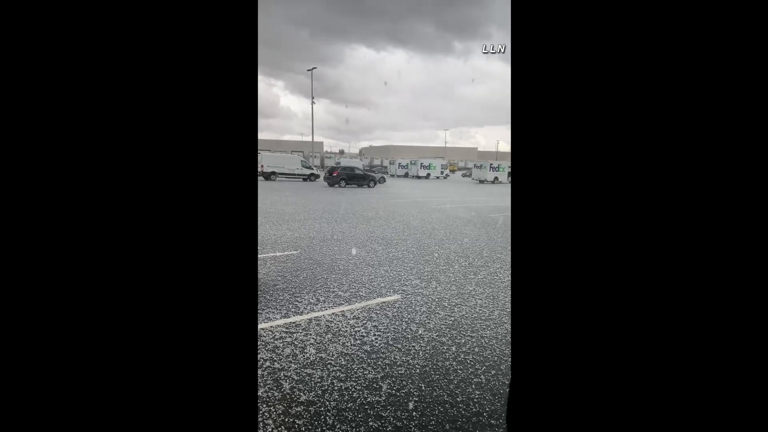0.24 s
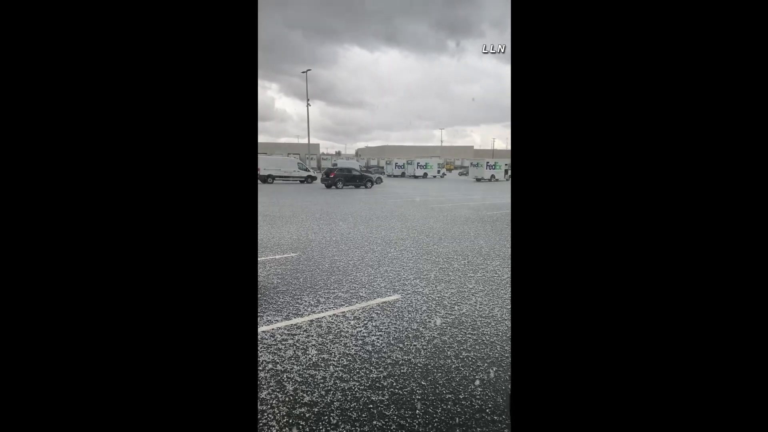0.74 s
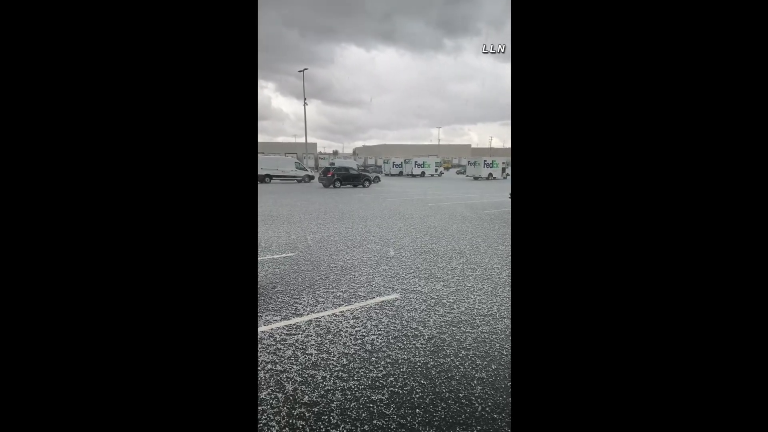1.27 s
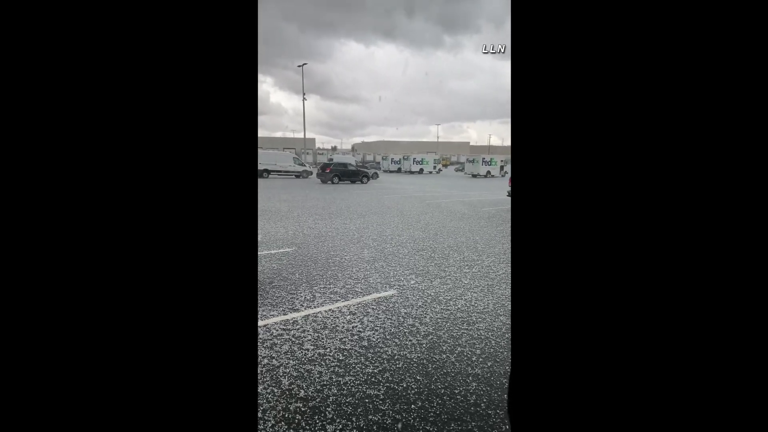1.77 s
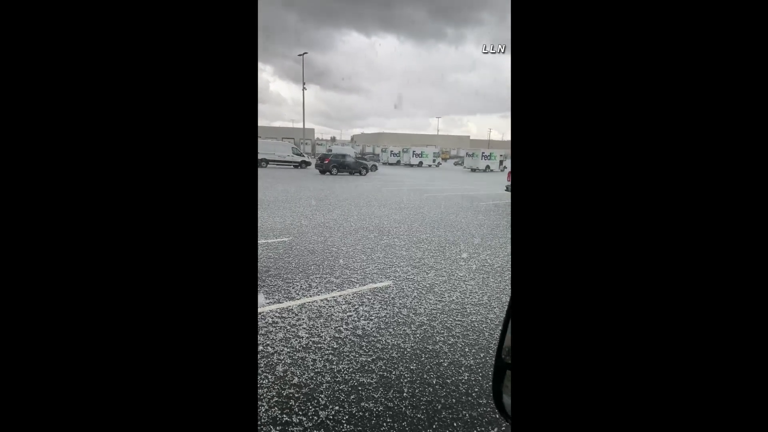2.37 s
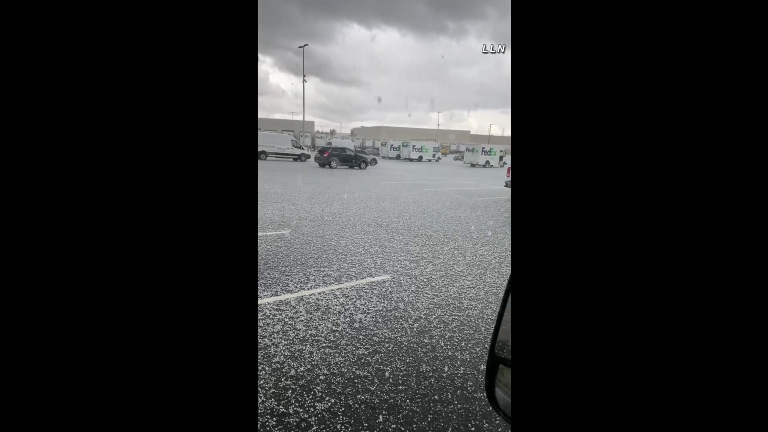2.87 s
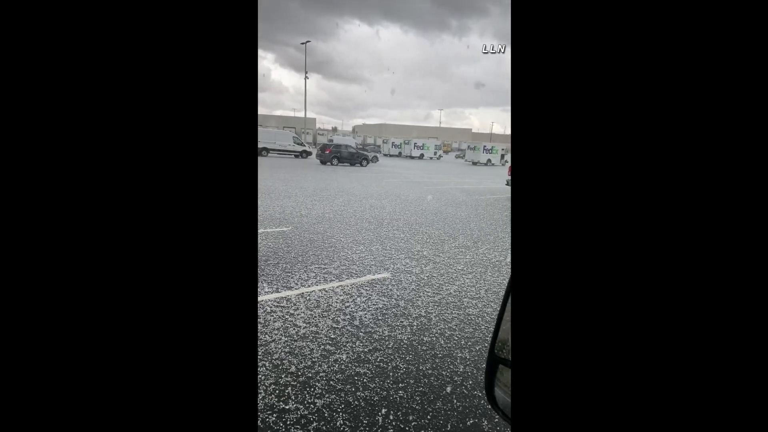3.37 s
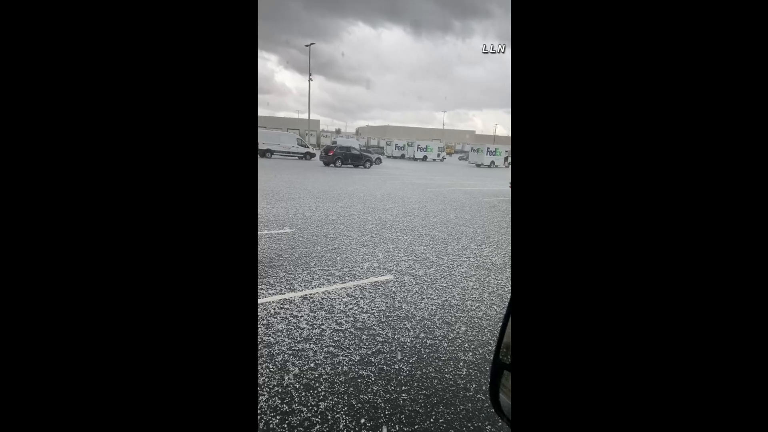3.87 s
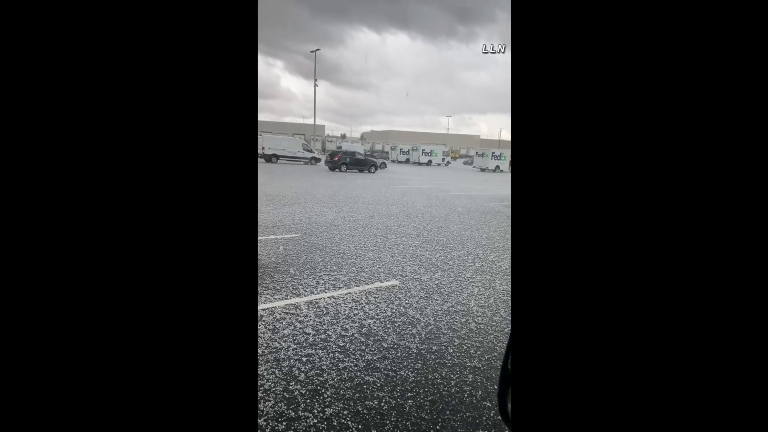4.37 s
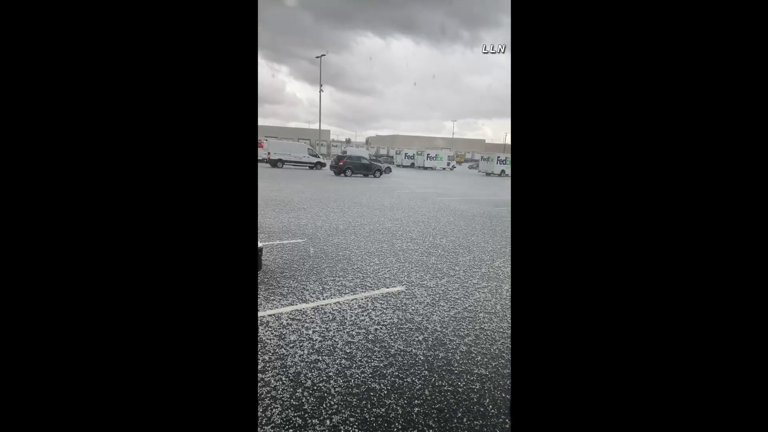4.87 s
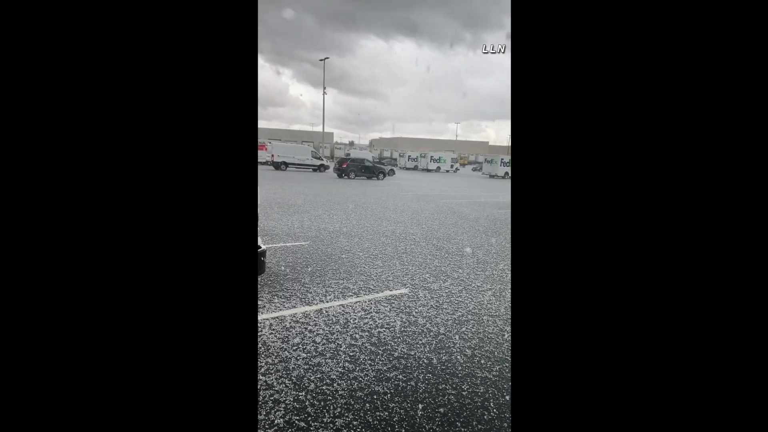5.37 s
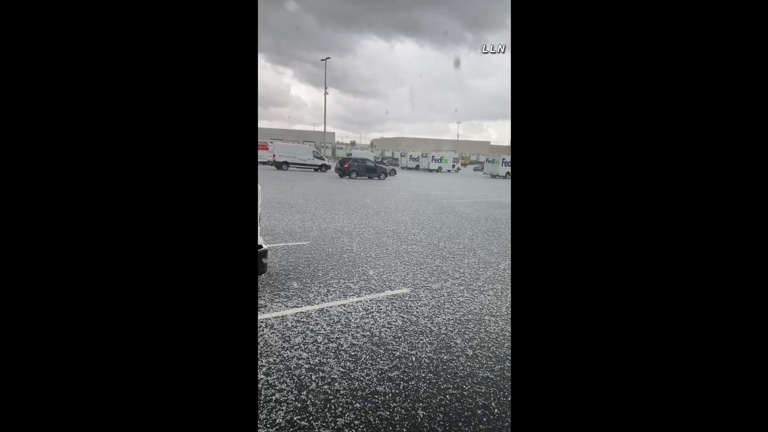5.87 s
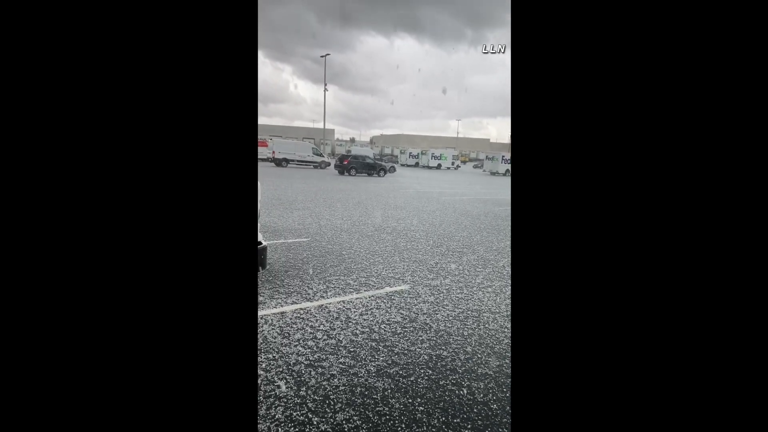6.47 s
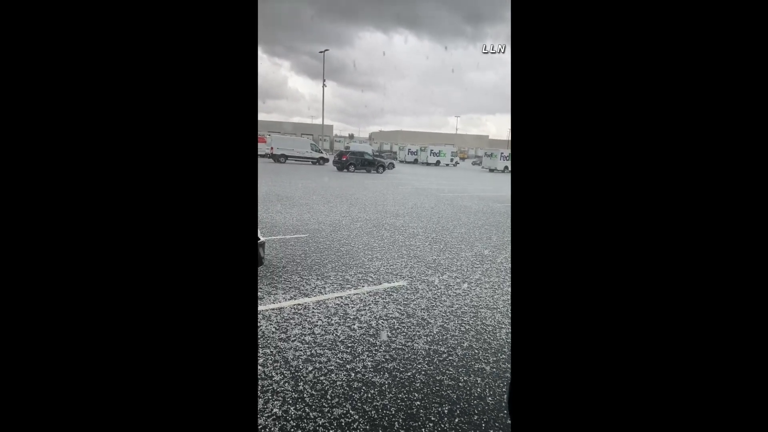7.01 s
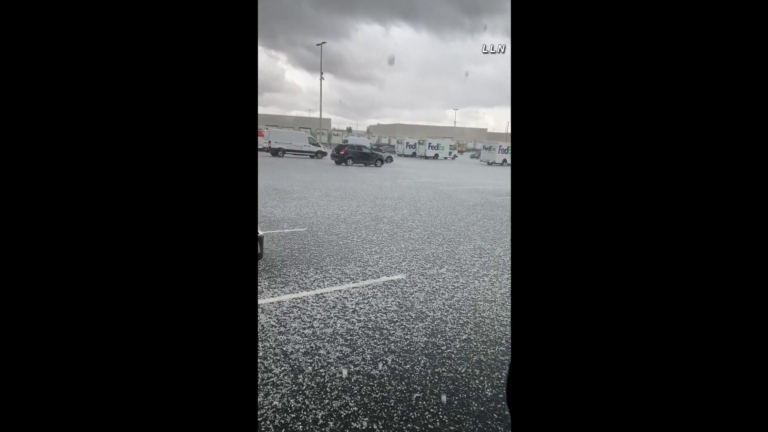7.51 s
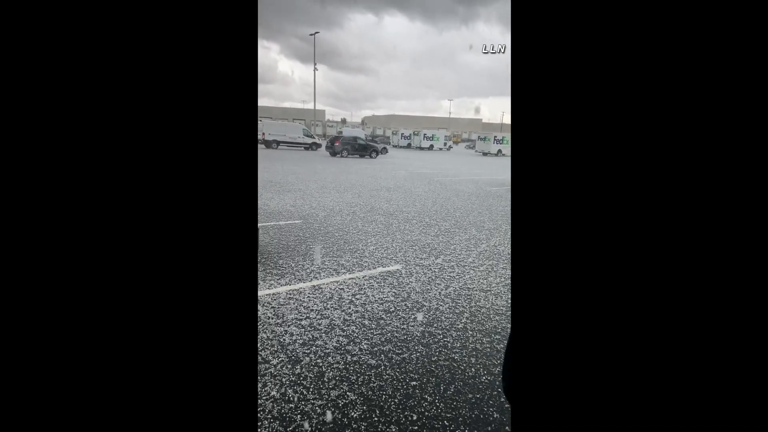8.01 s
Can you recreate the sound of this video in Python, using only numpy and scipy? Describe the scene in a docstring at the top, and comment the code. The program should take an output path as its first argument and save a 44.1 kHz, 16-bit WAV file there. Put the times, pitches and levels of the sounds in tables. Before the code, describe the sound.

Hard hail heard from inside a parked vehicle by its open window: steady crackly sizzle on pavement, metallic pings nearby, heavy roof drumming.

```python
"""Hail on a parked vehicle, heard through its open window by a phone with two microphone ports.
At first the fall is light: hiss from the asphalt, drumming overhead, high cracks on door, mirror and glass.
After two seconds the near stones ring lower; the gusts then grow, with heavy thumps booming in the cab.
In the last second the fall eases. Stones are short noise bursts and decaying sines; the dense fall is
noise lit by random impacts and shaped by the ground or the roof and cab."""
import sys
import numpy as np
from scipy import signal
from scipy.fft import rfft, irfft, next_fast_len
from scipy.io import wavfile
from scipy.ndimage import uniform_filter1d, map_coordinates

SR = 44100
rng = np.random.default_rng(int(sys.argv[2]) if len(sys.argv) > 2 else 0)


def elevation(decibels):
    """Turn decibel levels (scalar or array-like) into linear amplitude ratios."""
    levels = np.asarray(decibels, float)
    return 10 ** (levels / 20)


def waveform_to_disk(signal):
    """Save audio, clipped to [-1, 1], as 16-bit WAV at the path in sys.argv[1]."""
    frames = np.transpose(np.atleast_2d(signal))
    scaled = np.clip(frames, -1, 1) * 32767
    samples = np.round(scaled).astype(np.int16)
    wavfile.write(sys.argv[1], SR, samples)


N = 363825

# how hard the hail falls: (time [s], level on the asphalt [dB], level on the roof [dB])
HAIL_FALL = [(0, -35.5, -31), (.22, -37.5, -30), (.4, -34.5, -33), (.9, -34.5, -31), (1, -34, -30),
             (1.08, -36, -33), (1.2, -35.5, -28), (1.45, -34.5, -31.5), (1.6, -30, -27.5),
             (1.69, -35.5, -30.5), (1.73, -36.5, -28.5), (1.84, -35, -27.5), (1.88, -35.5, -35),
             (1.95, -32.5, -31), (2.2, -32, -29.5), (2.65, -33, -28.5), (2.85, -32.5, -29.5),
             (3.04, -33.5, -27.5), (3.14, -32, -29.5), (3.5, -30.5, -26.5), (3.9, -32.5, -29.5),
             (4.3, -33, -29.5), (4.75, -29.5, -29), (4.98, -30, -27), (5.3, -29.5, -27.5),
             (5.6, -29.5, -27.5), (6.3, -29.5, -27), (6.8, -29, -27), (7.05, -28.5, -27), (7.3, -31, -29),
             (7.5, -31, -31), (7.75, -32.5, -31), (8.05, -32, -29), (8.25, -32.5, -30.5)]
# single stones close to the window: (time [s], level [dB], ring centre [Hz], crack over the ring [dB])
NEAR_STONES = [(0.1603, -15, 4060, 1), (0.1845, -22, 3620, 4), (0.4469, -28, 3170, 0),
               (0.7068, -18.5, 2280, 0.5), (0.7751, -20, 3150, 3), (1.2605, -24, 3370, 4),
               (1.7494, -19.5, 4260, -5), (1.8432, -14, 3800, -8), (2.2258, -16, 3010, -3),
               (2.4882, -16, 3040, -4), (2.9317, -17, 2510, -4), (3.2085, -15.5, 3330, 4),
               (3.4361, -23, 4340, 4), (4.0875, -14, 3600, 1), (4.4338, -24, 2600, -3),
               (4.7331, -19, 3980, -27), (6.0975, -17, 3050, 2), (6.7925, -32, 2780, -5),
               (7.0963, -23, 2500, -8), (7.6216, -19.5, 2430, -3), (0.333, -18, 3120, -2),
               (0.4733, -14, 4000, -12), (0.642, -16, 2600, -2), (1.0106, -20, 2940, 2.5),
               (1.0814, -14, 3800, 1), (1.278, -13.5, 3900, -2), (1.3114, -10.5, 3900, -8),
               (1.4867, -16.5, 3580, -1), (1.5504, -22, 3740, 7), (1.5614, -20, 4220, 2),
               (1.5748, -12.5, 2860, -3), (1.62, -16, 3550, -5), (1.9014, -19, 3980, 4),
               (1.927, -17, 3800, -2), (1.9739, -14, 3470, -3), (2.0707, -15.5, 3260, 3.5),
               (2.1016, -17, 3030, 1), (2.1635, -22, 3500, 7), (2.1967, -17, 2860, 2),
               (2.275, -18, 2880, 0), (2.57, -15.5, 3010, 0), (2.6883, -15.5, 3800, 5),
               (3.1896, -14, 2740, 2), (3.2024, -18, 3280, -7), (3.2854, -21, 2500, -1),
               (3.366, -17, 3220, -2), (3.5054, -14, 2230, -16), (3.5958, -12, 4200, 2.5),
               (3.693, -13, 2550, -1), (3.761, -8.5, 2640, -3), (3.933, -16, 2870, 1.5),
               (4.0203, -13.5, 2650, -3), (4.079, -9, 4700, -5), (4.1034, -9.5, 2860, -2),
               (4.329, -12.5, 2580, -3), (4.3819, -15, 3750, -1), (4.527, -17.5, 2850, -1),
               (4.5404, -20, 2970, 1), (4.576, -9.5, 2620, -6), (4.7476, -10.5, 3800, -6),
               (4.8035, -13, 2680, -3), (4.8334, -19, 3140, -3), (5.0075, -19, 3780, 3),
               (5.075, -18, 2860, 0), (5.1324, -11, 4640, -6), (5.2794, -12.5, 2750, -3),
               (5.3215, -16, 2740, -4), (5.5004, -13, 2660, 0), (5.7416, -20, 3150, 2),
               (5.8184, -13, 3200, -2), (5.9864, -12.5, 3220, -3), (6.111, -11, 3320, -3),
               (6.195, -9.5, 2700, -5), (6.3056, -15, 2750, -4), (6.4824, -16.5, 2750, 3),
               (6.5304, -17, 2280, 1), (6.8094, -16, 2850, -2), (7.0527, -9, 2520, -8),
               (7.3565, -14.5, 4040, 1), (7.4815, -12, 4250, -3), (7.563, -14, 2420, -9),
               (8.1703, -16, 2570, -4), (1.0685, -23, 4600, -5), (2.112, -21, 3600, 6),
               (2.2585, -20, 3900, 3), (3.5803, -24, 2870, 3), (3.666, -16, 3570, 2),
               (3.721, -24, 3500, -2), (3.789, -17, 2900, 0), (4.0128, -16, 2340, 1),
               (4.3146, -24, 3150, 0), (4.9372, -21, 3010, 2), (5.001, -19, 3380, 0),
               (5.5074, -15, 2520, -4), (6.5196, -22, 2300, 2), (6.574, -21, 2470, -3),
               (6.6662, -21, 3170, -4), (7.795, -19, 2750, 0), (7.905, -20.5, 3300, -2),
               (8.005, -15, 3700, 1), (8.03, -14, 2680, -9), (8.135, -21, 4300, 2)]
# where small near stones mostly ring, higher while the fall is light: (time [s], pitch [Hz])
RING_PITCH = [(0, 3740), (1.9, 3750), (2.3, 2850), (4.2, 2760), (5, 2750), (8.25, 2750)]
# modes of the bodywork under small stones, the three lowest from dents in the roof, the rest from door, mirror
# and glass: (pitch [Hz], level [dB], 60 dB decay [s])
BODYWORK_MODES = [(816.5, 3.5, 0.12), (1071, 2.5, 0.13), (1425, 5, 0.11), (1770, -8, 0.036),
                  (2570, -3.5, 0.19), (2750, 0, 0.13), (3010, -3, 0.25), (3560, -23, 0.08),
                  (3750, -3.5, 0.17), (4220, -8, 0.048), (4540, 3.5, 0.11)]
# the heaviest stones on the roof: (time [s], level [dB], favoured panel pitch [Hz])
HEAVY_STONES = [(0.069, -17, 337), (0.199, -16, 401), (0.63, -19, 318), (0.98, -16.5, 328),
                (1.197, -19, 380), (1.376, -17, 320), (1.55, -16, 318), (1.617, -12, 366),
                (1.711, -23, 393), (1.771, -12, 370), (1.803, -16, 390), (1.837, -12.5, 310),
                (2.352, -13, 380), (2.564, -19, 374), (2.669, -14, 689), (2.853, -13.5, 398),
                (3.008, -17, 237), (3.045, -15, 350), (3.248, -22, 352), (3.395, -23, 358),
                (3.682, -10, 697), (4.0, -16, 668), (4.24, -15, 350), (4.384, -11, 291), (4.474, -15, 266),
                (4.901, -15, 584), (4.979, -12, 395), (5.066, -11.5, 396), (5.244, -26, 320),
                (5.566, -13.5, 297), (5.661, -8.5, 368), (6.353, -12, 275), (6.435, -16.5, 318),
                (6.611, -11, 436), (6.929, -23, 248), (7.038, -16, 300), (7.139, -21, 388),
                (7.566, -15.5, 336), (7.795, -14.5, 401), (8.119, -18, 320), (0.223, -15, 383),
                (0.285, -18, 400), (1.148, -16, 300), (1.232, -22, 350), (1.664, -16, 300),
                (1.734, -15, 430)]
# resonances of roof panels and cab air: (centre [Hz], width [Hz], level [dB])
CAB_MODES = [(52.6, 12.5, -5.5), (82.3, 4.3, -4.5), (146.6, 60, -3), (275, 42, -1.5), (320, 34, -2),
             (385.6, 103, 0), (645.4, 81, -0.5), (870, 450, -5), (1130, 640, -10.5), (1356, 76, -8.5)]
# colour of ice on asphalt through the window: (frequency [Hz], density [dB per Hz])
ASPHALT_COLOUR = [(300, -20), (900, -4.5), (1400, -7.5), (1800, -3.5), (2200, 0), (2700, 0.5), (3600, -2.5),
                  (5000, -3.5), (7000, -8.3), (9000, -12.5), (10500, -17.5), (11500, -17.5), (13000, -16),
                  (14500, -22), (15600, -29)]
# how alike the two ports hear: (frequency [Hz], likeness [0-1])
PORT_LIKENESS = [(60, .9997), (180, .997), (280, .985), (400, .95), (560, .5), (750, .25), (1050, .39),
                 (1350, .66), (1850, .14), (2700, .63), (3600, .24), (4900, .57), (5400, .53), (6400, .81),
                 (8200, .9), (8800, .97), (11000, .97), (11600, .9), (12300, .88), (15500, .7)]
# phase by which the left port leads: (frequency [Hz], lead [rad])
PORT_LEAD = [(200, 0), (300, -.1), (520, -.4), (700, 0), (1000, 3.3), (1300, 2.7), (1800, 2.0), (2200, 2.8),
             (3100, 2.3), (4000, 1.6), (4900, 2.5), (5600, 1.9), (7500, 2.5), (8400, 3.0), (8900, np.pi),
             (11000, np.pi), (12000, 3.7), (15500, 5.1)]
# balance of the ports: (frequency [Hz], left over right [dB])
PORT_TILT = [(150, 0), (300, -1.4), (480, .5), (640, -2), (850, 4), (1200, 1.5), (1500, 0), (2300, 1),
             (4200, -1.5), (5500, 0), (8000, 0)]


def stones(rows):
    """Each near stone cracks, pings at its own pitch and rattles the bodywork, as three noise bursts."""
    out = np.zeros((2, N + SR))
    t = np.arange(2048) / SR

    def fade(rise_s, t60):
        return (1 - np.exp(-t / rise_s)) * elevation(-60 * t / t60)

    for s, db, hz, crack_db in rows:
        crack = elevation(crack_db) * burst(fade(0.0004, 0.015), 1.2 * hz, octaves=0.75)
        ping = elevation(-12.5) * burst(fade(0.0008, 0.08), hz, octaves=0.05)
        # the rattle leans from the stone's own pitch towards 3800 Hz
        rattle_hz = hz * (3800 / hz) ** 0.12
        rattle = elevation(-10.5) * burst(fade(0.0045, 0.068), rattle_hz, octaves=0.65)
        out[:, round(s * SR):][:, :len(t)] += elevation(db) * (crack + ping + rattle)
    return filtered(out[:, :N], lambda hz: 1 / (1 + (hz / 7500) ** 4))


def small_stones(count):
    """Rows for weaker near stones at random moments, as strong as the fall on the asphalt."""
    s = rng.random(count) * N / SR
    size, pitch, hard = rng.standard_normal((count, 3)).T
    db = np.interp(s, *np.transpose(HAIL_FALL)[:2]) + 5 + 2 * size
    hz = np.interp(s, *np.transpose(RING_PITCH)) * np.exp(0.11 * pitch)
    crack_db = -6 + 2 * hard
    return list(zip(s, db, hz, crack_db))


def patter(gain, count):
    """Many smaller stones on nearby bodywork, each waking one of its modes as a decaying sine."""
    when, size, phase, pick = rng.random((count, 4)).T[..., None]
    mode = (pick * len(BODYWORK_MODES)).astype(int)
    hz, db, t60 = np.transpose(BODYWORK_MODES)[:, mode]
    pitch = hz * np.exp(0.0708 * rng.standard_normal((2, count, 1)))
    # modes near the ring pitch of the moment sound up to 7 dB louder
    octaves_off = np.log2(hz / np.interp(when * N / SR, *np.transpose(RING_PITCH)))
    db = db + 7 * np.exp(-(octaves_off / 0.12) ** 2)
    t = np.arange(SR // 22) / SR
    envelope = elevation(db + 10 * size - 60 * t / t60) * (1 - np.exp(-t / 0.0012))
    grains = envelope * np.sin(2 * np.pi * (pitch * t + phase))
    return elevation(-1.5) * gain * unit(scatter(grains, when))


def thumps():
    """A heavy stone overhead sets the roof modes near its pitch booming for a moment."""
    rise_s, t60, octaves = 0.0059, 0.058, 0.35  # octaves: reach of the modes a stone wakes
    out = np.zeros((2, N + SR))
    t = np.arange(SR // 8) / SR
    hz, width, db = np.transpose(CAB_MODES)[..., None]
    envelope = (1 - np.exp(-t / rise_s)) * elevation(-60 * t / t60)
    for s, level_db, centre_hz in HEAVY_STONES:
        share = elevation(db) * np.exp(-(np.log2(hz / centre_hz) / octaves) ** 2)
        pitch = hz + 0.4 * width * rng.standard_normal((2, len(CAB_MODES), 1))
        phase = rng.random((2, len(CAB_MODES), 1))
        sines = np.sin(2 * np.pi * (pitch * t + phase))
        ring = np.sum(share * sines, axis=1) / np.linalg.norm(share)
        out[:, round(s * SR):][:, :len(t)] += elevation(level_db) * envelope * ring
    return out[:, :N]


def roof(boom_gain, drum_gain):
    """Dense thuds on sheet metal: the panels follow every gust, the deep cab modes only the slow swell."""
    thuds = shower(spread_db=3.0, t60=0.22, patchy_db=0.08, count=15000)
    body = modes(CAB_MODES)

    def deep(hz):
        return 1 / (1 + (hz / 215) ** 8)

    boom = filtered(rng.standard_normal((2, N)), lambda hz: body(hz) * np.sqrt(deep(hz)))
    drum = filtered(thuds, lambda hz: body(hz) * np.sqrt(1 - deep(hz)))
    return boom_gain * unit(boom) + elevation(1.57) * drum_gain * unit(drum)


def pellets(gain, count):
    """Tiny pellets tick on the ground close by: a few cycles of a sine each, loud ones rare."""
    when, size, phase = rng.random((count, 3)).T[..., None]
    centre_hz = np.interp(when * N / SR, *np.transpose(RING_PITCH)) * 1.17
    hz = centre_hz * np.exp(0.34 * rng.standard_normal((2, count, 1)))
    t = np.arange(SR // 200) / SR
    level_db = -1.5 * np.log(1 - .96 * size)
    # each falls by 30 dB in 2.3 cycles
    grains = elevation(level_db - 30 * hz * t / 2.3) * np.sin(2 * np.pi * (hz * t + phase))
    return elevation(-7) * gain * unit(scatter(grains, when))


def asphalt(clatter_gain, sizzle_gain):
    """A far smooth hiss and nearer separate ticks; the sizzle of shattering ice above has its own swell."""
    far = unit(shower(spread_db=0, t60=0.057, patchy_db=1.1, count=6500))
    near = unit(shower(spread_db=4.0, t60=0.037, patchy_db=4.0, count=2500))

    def split(hz):
        high = 1 / (1 + (8600 / (hz + 1)) ** 6)
        return elevation(along(ASPHALT_COLOUR, hz)) * np.sqrt([1 - high, high])[:, None]

    clatter, sizzle = filtered(far + elevation(-9) * near, split)
    return elevation(1.15) * clatter_gain * unit(clatter) + sizzle_gain * unit(sizzle)


def gusts():
    """Gains of boom, drum, clatter and sizzle: two swells, with quick random unevenness in the layers."""
    flutter_per_s = 18
    s, ground_db, roof_db = np.transpose(HAIL_FALL)
    t = np.arange(N) / SR
    ground_db = np.interp(t, s, ground_db)
    roof_db = np.interp(t, s, roof_db)
    # clatter and sizzle share this flutter
    ground_db = ground_db + 1.2 * wobble(flutter_per_s)
    roof_swing = roof_db - roof_db.mean()
    ground_swing = ground_db - ground_db.mean()
    # the boom follows the roof's swing smoothed over a third of a second
    boom_db = -33.5 + 0.99 * uniform_filter1d(roof_swing, size=SR // 3)
    drum_db = roof_db + 1 * wobble(flutter_per_s)
    clatter_db = ground_db + 0.06 * wobble(flutter_per_s)
    sizzle_db = -39 + 0.96 * ground_swing + 0.4 * wobble(flutter_per_s / 2)
    return elevation([boom_db, drum_db, clatter_db, sizzle_db])


def shower(spread_db, t60, patchy_db, count):
    """Two unrelated noises lit by the same random stones, each a burst dying in t60; big stones are rare."""
    when, size = rng.random((count, 2)).T
    stone_energy = elevation(-2 * spread_db * np.log(1 - size * .99))
    energy = np.bincount((when * N).astype(int), stone_energy, N)
    power = signal.lfilter([1], [1, -elevation(-120 / (max(t60, .002) * SR))], energy)
    z = signal.stft(np.sqrt(power) * rng.standard_normal((2, N)), nperseg=256)[2]
    # stones differ in size and ground, so colour comes in patches
    field = uniform_filter1d(rng.standard_normal(z.shape[1:]), size=8, axis=0)
    field = uniform_filter1d(field, size=9, axis=1)
    return signal.istft(z * elevation(patchy_db * unit(field)), nperseg=256)[1][:, :N]


def burst(envelope, centre_hz, octaves):
    """Two noises around a pitch under an envelope, each with the envelope's energy."""
    n = len(envelope)
    f = np.fft.rfftfreq(n, 1 / SR) + 1
    band = np.exp(-(np.log2(f / centre_hz) / octaves) ** 2)
    x = envelope * irfft(rfft(rng.standard_normal((2, n))) * band, n)
    return x * np.linalg.norm(envelope) / np.linalg.norm(x, axis=1, keepdims=True)


def scatter(grains, when):
    """Adds up each port's grains, starting at fractions 0-1 of the whole duration."""
    where = ((when * N).astype(int) + np.arange(grains.shape[-1])).ravel()
    return np.array([np.bincount(where, g.ravel(), N)[:N] for g in grains])


def wobble(per_s):
    """A smooth random curve of rms 1, per_s knots a second."""
    return unit(map_coordinates(rng.standard_normal(N // 200), [np.arange(N) * per_s / SR]))


def unit(x):
    """Scales to rms 1."""
    return x / np.sqrt(np.mean(x ** 2) + 1e-20)


def along(points, hz):
    """(frequency [Hz], value) points read on a log frequency axis."""
    f, v = np.transpose(points)
    return np.interp(np.log(hz + 1), np.log(f + 1), v)


def filtered(x, response):
    """x times a complex response of frequency."""
    m = next_fast_len(N + SR // 2)
    return irfft(rfft(x, m) * response(np.fft.rfftfreq(m, 1 / SR)), m)[..., :N]


def modes(table):
    """Response of a body with resonances whose powers add."""
    def response(f):
        power = 0
        for centre, width, db in table:
            damping = (f * width) ** 2
            power = power + elevation(2 * db) * damping / ((centre ** 2 - f * f) ** 2 + damping)
        return np.sqrt(power)
    return response


def ports(pair):
    """Shared and unrelated parts mixed by likeness, then shifted and tilted between the ports."""
    def blend(hz):
        turn = np.arccos(np.clip(along(PORT_LIKENESS, hz), 0, 1)) / 2
        return np.array([np.cos(turn), np.sin(turn)])

    def left_right(hz):
        # each port takes half of the tilt and of the lead
        half = elevation(along(PORT_TILT, hz) / 2) * np.exp(.5j * along(PORT_LEAD, hz))
        return np.array([half, 1 / half])

    shared, apart = filtered(pair, blend)
    return filtered(np.array([shared + apart, shared - apart]), left_right)


def scene():
    """All the hail as it reaches the two ports."""
    boom_gain, drum_gain, clatter_gain, sizzle_gain = gusts()
    near = stones(NEAR_STONES + small_stones(count=420))
    bodywork = patter(clatter_gain, count=2600)
    overhead = thumps() + roof(boom_gain, drum_gain)
    ground = pellets(clatter_gain, count=7000) + asphalt(clatter_gain, sizzle_gain)
    return ports(near + bodywork + overhead + ground)


def top_cut(x):
    """Nothing passes above the cut-off."""
    return signal.sosfilt(signal.butter(12, 16970, fs=SR, output="sos"), x)


def record(dry):
    """The phone cuts the deepest bass below 45 Hz and everything from 15740 Hz up."""
    def band(hz):
        return (hz < 15740) / np.sqrt(1 + (45 / (hz + 1)) ** 4)

    mix = filtered(dry, band)
    return top_cut(mix)


dry = scene()
out = record(dry)
waveform_to_disk(out)
```